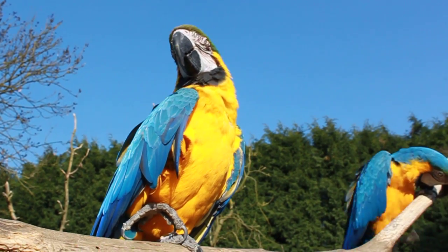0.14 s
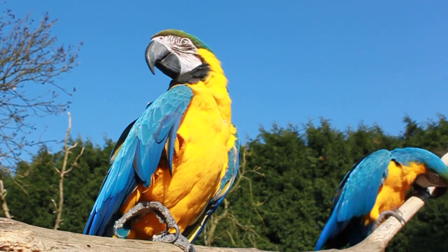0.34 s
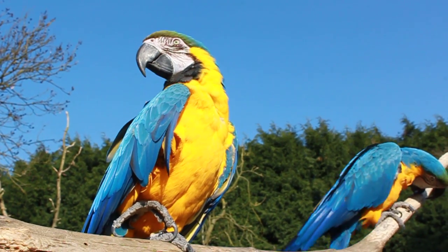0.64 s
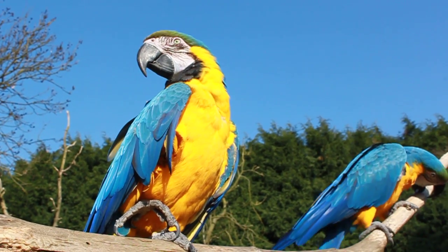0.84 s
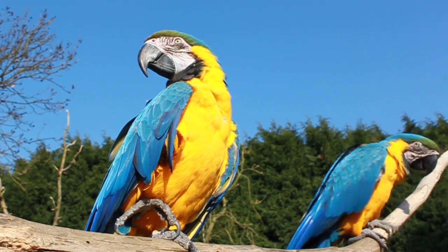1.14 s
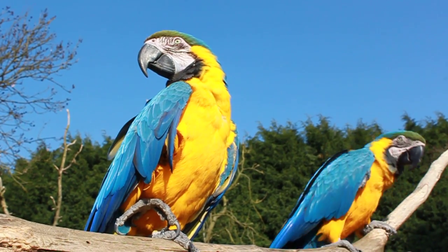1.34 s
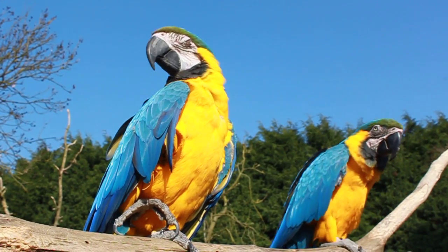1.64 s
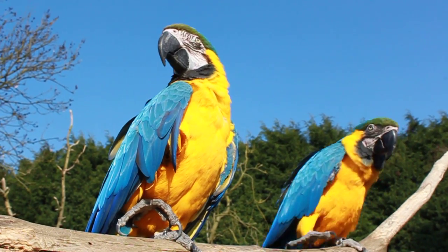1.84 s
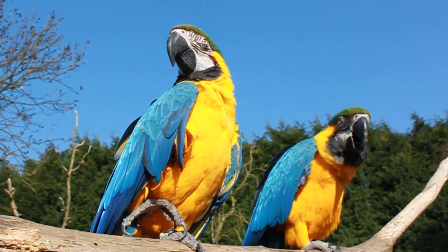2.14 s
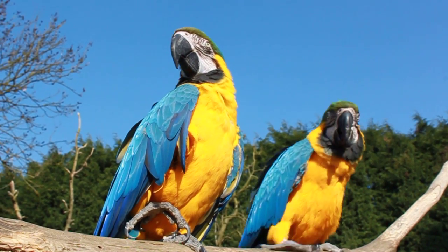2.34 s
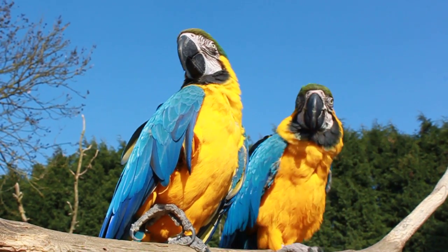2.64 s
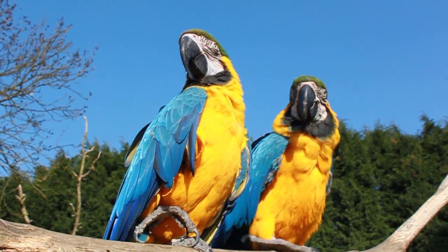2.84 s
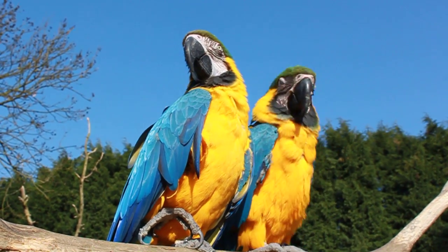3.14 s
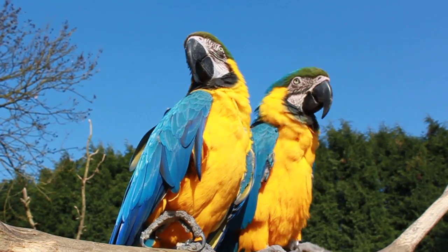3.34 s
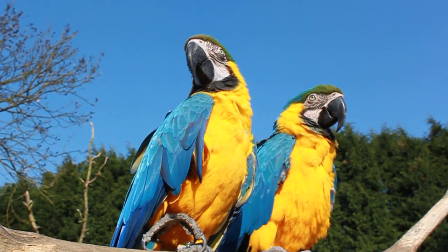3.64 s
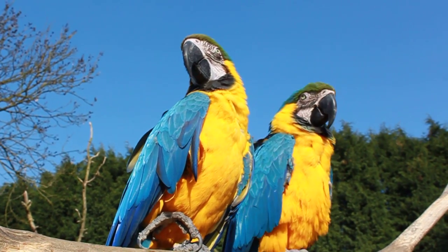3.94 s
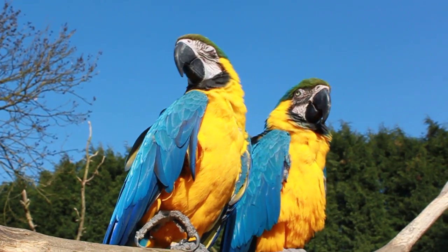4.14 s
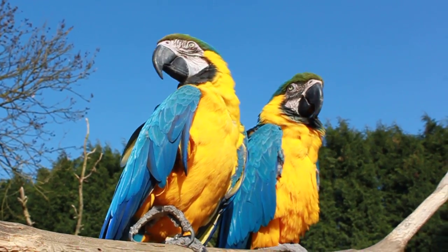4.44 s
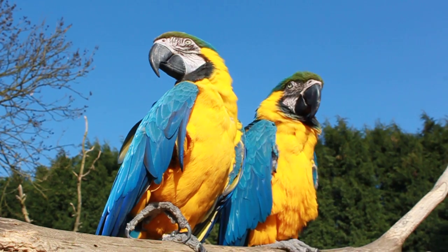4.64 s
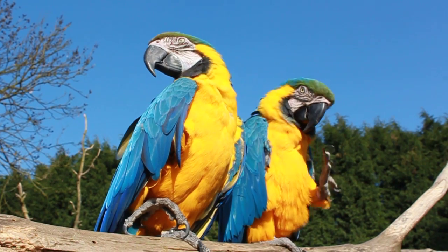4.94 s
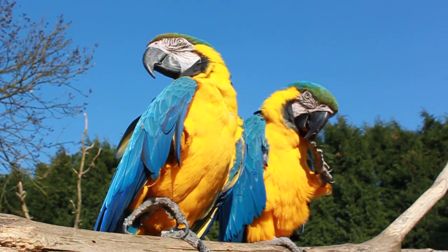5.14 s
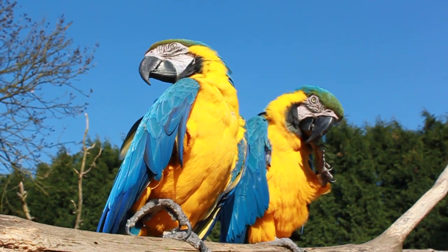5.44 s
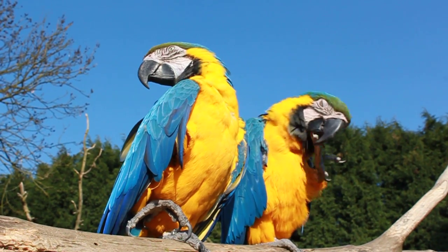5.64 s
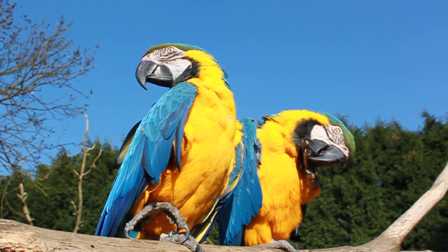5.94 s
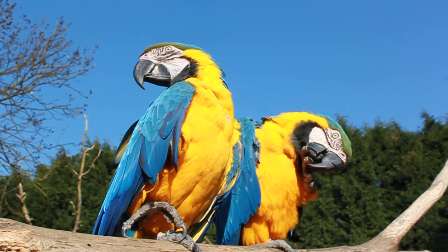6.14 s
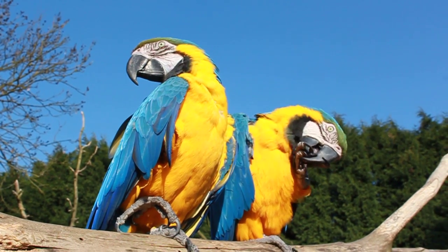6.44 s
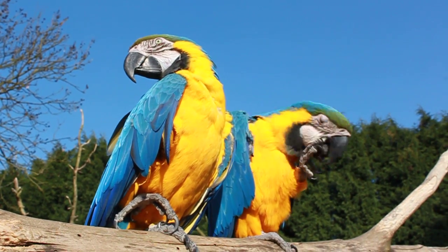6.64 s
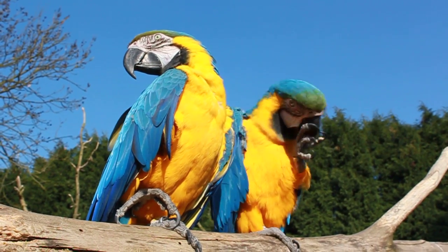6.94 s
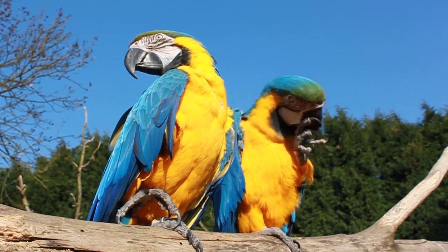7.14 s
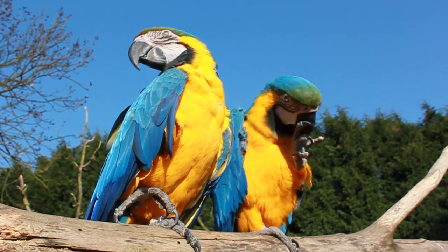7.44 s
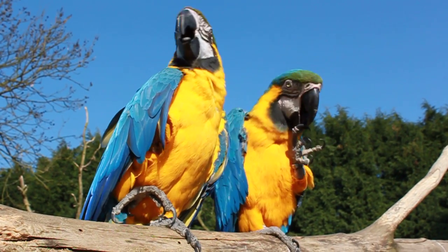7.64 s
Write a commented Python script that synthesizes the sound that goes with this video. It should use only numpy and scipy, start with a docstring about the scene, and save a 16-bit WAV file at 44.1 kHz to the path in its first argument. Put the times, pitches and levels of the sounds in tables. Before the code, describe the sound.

Large parrots call outdoors over a very faint airy hush and hum, with short diffuse echoes from hedges and walls. From 0 s, hoarse, fluttering screeches and a clear yelp burst out close, followed by rough screams near 0.65 s, more distant echoing ones from 1 s, and a strong lower scream at 1.75 s. Dry beak and claw ticks click around 0.4 and 1.2 s. Yelps at 2 s meet a short close rattling growl at 2.1 s. From 2.4 s one bird repeats a piercing whistle, sliding rapidly upward with a raspy edge, roughly every half second, with harsh screams at 3.1 to 3.9 s. Very soft perch bumps pass near 5 s, with another screech at 5.25 s. Whistles continue at 5.65, 6.25 and 6.9 s, separated by pauses and ticks. A faint yelp at 7.4 s precedes a soft grunt and loud, close, rattling growl from 7.5 to 7.8 s.

```python
"""Macaws in a garden, over a faint outdoor hush and hum: hoarse rough-voiced screeches and clear yelps
from the start, joined by noise ticks of beak and claws. At 2.1 s slapping membranes growl close by.
From 2.4 s one bird keeps sweeping up into a piercing near-sine whistle with a rasp at half its pitch.
Soft low bumps of the perch follow around 5 s; a second rattling growl ends the scene.
Hedges and walls answer the calls and clicks with a decaying noise echo."""
import sys
import numpy as np
from scipy import signal
from scipy.fft import rfft, irfft, next_fast_len
from scipy.io import wavfile
from scipy.ndimage import uniform_filter1d, minimum_filter1d, map_coordinates

SR = 44100
rng = np.random.default_rng(int(sys.argv[2]) if len(sys.argv) > 2 else 0)


def dump_mix(stems):
    """Bounce the given channels to the path in sys.argv[1] as a 16-bit WAV at rate SR."""
    frames = np.atleast_2d(stems).T  # one column per channel
    limited = np.clip(frames, -1, 1)  # hard clip at full scale
    pcm = np.round(limited * 32767).astype(np.int16)
    wavfile.write(sys.argv[1], SR, pcm)


N = 343980
TOP_HZ = 15800  # band limit


def amp(db):
    """Decibels to gain."""
    return 10 ** (np.asarray(db) / 20)


def unit(x):
    """Scale to rms 1."""
    return x / np.sqrt(np.mean(x ** 2) + 1e-20)


def along(points, hz):
    """(Hz, value) points read on a log frequency axis."""
    f, v = np.transpose(points)
    return np.interp(np.log(hz + 1), np.log(f + 1), v)


def read(rows, t):
    """Each column of a curve at the times t."""
    s, *columns = np.transpose(rows)
    return [np.interp(t, s, column) for column in columns]


def times(start_s, length_s):
    """The sample times of a call."""
    return start_s + np.arange(max(round(length_s * SR), 256)) / SR


def span(rows):
    """The sample times that a curve covers."""
    return times(rows[0][0], rows[-1][0] - rows[0][0])


def swell(t, attack_s, release_s):
    """Gain that rises, holds and falls."""
    return np.clip(np.minimum((t - t[0]) / attack_s, (t[-1] - t) / release_s), 0, 1)


def bell(t, centre, width):
    """A smooth hump of height 1."""
    return np.exp(-((t - centre) / width) ** 2)


def wobble(t, knots_per_s):
    """A smooth random curve."""
    return map_coordinates(rng.standard_normal(8192), [(t - t[0]) * knots_per_s], mode="wrap")


def filtered(x, response):
    """x times a response of frequency."""
    m = next_fast_len(len(x) + 4096)
    return irfft(rfft(x, m) * response(np.fft.rfftfreq(m, 1 / SR)), m)[:len(x)]


def coloured(x, points):
    """x with a (Hz, dB) colour, at rms 1."""
    return unit(filtered(x, lambda hz: amp(along(points, hz))))


def resonate(x, points, tilt_db):
    """Ring a (Hz, dB) body with x: a minimum-phase response, so each pulse decays after it strikes."""
    m = next_fast_len(len(x) + 4096)
    hz = np.fft.rfftfreq(m, 1 / SR)
    level_db = along(points, hz) + tilt_db * np.log2(1 + hz / 1000)
    cepstrum = irfft(np.log(amp(level_db)), m)
    cepstrum[1:m // 2] *= 2
    cepstrum[m // 2 + 1:] = 0
    response = np.exp(rfft(cepstrum))
    return unit(irfft(rfft(x, m) * response, m)[:len(x)])


def add(track, t, x):
    """Mix a call in at its time, with soft ends."""
    room = track[max(round(t[0] * SR), 0):][:len(x)]
    room += (x * swell(t, 0.0011, .0018))[:len(room)]


def cycles(hz):
    """Phase in radians of a moving pitch."""
    return 2 * np.pi * np.cumsum(hz) / SR


def buzz(phase, hz):
    """One sharp pulse a cycle: equal cosine harmonics up to the band limit at the mean pitch."""
    k = np.arange(1, int(TOP_HZ / np.mean(hz)) + 1)[:, None]
    below_nyquist = k * hz < SR / 2
    return unit(np.sum(np.cos(k * phase) * below_nyquist, axis=0))


def rough_voice(t, hz, rough, jitter):
    """Membranes slap at an unsteady, wandering rate and release a puff of turbulence each cycle."""
    rough = np.clip(rough, 0, 1)
    wander = .025 * wobble(t, 45)
    phase = cycles(hz * (1 + rough * (wander + jitter * wobble(t, 650))))
    puffs = unit(rng.standard_normal(len(t)) * (1 + 0.62 * np.cos(phase)))
    return np.sqrt(1 - rough ** 2) * buzz(phase, hz) + rough * puffs


# bass level of the outdoor air, before an offset: (time [s], level [dB])
HUSH = [(0.0, -66.5), (1.5, -53.5), (2.02, -56.5), (2.33, -73), (3.19, -61.5), (3.77, -69), (4.31, -68.5),
        (6.37, -66.5), (7.4, -64)]
# spectrum of the air: (frequency [Hz], relative level [dB])
HUSH_COLOUR = [(20, -13), (48, -1.5), (70, -11), (100, 0), (140, -3), (290, -1.5), (450, -5), (800, -5),
               (1500, -2), (4000, -3.5), (8000, -22.5), (16000, -28.5)]
# faint hum partials, before a trim: (mean frequency [Hz], level [dB])
HUM = [(193.8, -76), (290.7, -74), (667.5, -82), (721.4, -71)]


def hush(over_bass_db=9, hum_db=-1):
    """Faint outdoor air, slowly swelling noise, and slightly wavering sines as a hum."""
    t = np.arange(N) / SR
    level_db = read(HUSH, t)[0] + over_bass_db + wobble(t, 13)
    air = coloured(rng.standard_normal(N), HUSH_COLOUR) * amp(level_db)
    hum = np.zeros(N)
    for hz, db in HUM:
        phase = cycles(hz * (1 + 0.00306 * wobble(t, 5.5)))
        hum += amp(db + hum_db) * unit(np.sin(phase))
    return air + hum


# decay of the echo: (frequency [Hz], time to fall 60 dB [s])
GARDEN = [(200, 0.97), (2000, 0.69), (4000, 0.47), (8000, 0.47), (15000, 0.13)]


def garden(x, build_s=0.0035):
    """Scattered echoes from hedges and walls; the treble dies first."""
    hz, t, z = signal.stft(rng.standard_normal(SR), SR, nperseg=256)
    decay = amp(-60 * t / along(GARDEN, hz)[:, None])
    build = 1 - np.exp(-t / build_s)
    tail = signal.istft(z * decay * build, SR, nperseg=256)[1]
    return signal.fftconvolve(x, tail / np.linalg.norm(tail))[:N]


# bumps of the perch: (time [s], half length to 1/e [s], level [dB])
BUMPS = [(4.55, .08, -65), (4.86, 0.046, -61), (4.96, 0.022, -60), (5.405, .03, -62)]
# spectrum of the bumps: (frequency [Hz], relative level [dB])
BUMP_COLOUR = [(20, -14), (50, -2), (110, -1), (200, -6), (500, -32), (2000, -67)]


def perch():
    """The branch bumps softly as a bird shifts its weight: low noise under smooth humps."""
    t = np.arange(N) / SR
    noise = coloured(rng.standard_normal(N), BUMP_COLOUR)
    return noise * sum(amp(db) * bell(t, s, half_s) for s, half_s, db in BUMPS)


# ticks of beak and claws, before a trim: (time [s], level [dB])
CLICKS = [(0.3681, -33.5), (1.1755, -32), (1.2203, -33.5), (1.3076, -34.5), (4.237, -46), (4.3112, -45),
          (6.5878, -35), (6.617, -37), (6.702, -37.5), (7.1376, -28), (7.3414, -42), (7.401, -39)]
# spectrum of a tick: (frequency [Hz], relative level [dB])
CLICK_COLOUR = [(300, -33), (1500, 15), (5000, 11.5), (10000, 1.5), (16000, -3)]


def clicks(gain_db=-2):
    """Dry ticks of beak and claws: noise that dies 60 dB in 14 ms."""
    out, t = np.zeros(N), np.arange(SR // 20) / SR
    fade_db = -60 * t / .014
    for s, db in CLICKS:
        tick = coloured(rng.standard_normal(len(t)), CLICK_COLOUR) * amp(db + gain_db + fade_db)
        out[round(s * SR):][:len(t)] += tick
    return out


def mouthed(x, t, throat, shift=0.031):
    """Tongue and beak keep moving, so the throat's resonances drift up and down."""
    low = coloured(x, [(hz * (1 - shift), db) for hz, db in throat])
    high = coloured(x, [(hz * (1 + shift), db) for hz, db in throat])
    share = (1 + np.tanh(wobble(t, 18.3))) / 2
    return unit(share * high + (1 - share) * low)


def nearby(x, share):
    """Perches and fences add a cluster of quick echoes that blur the single pulses."""
    t = np.arange(SR // 50) / SR
    cluster = rng.standard_normal(len(t)) * np.exp(-t / 0.0066)
    return unit(x + share * signal.fftconvolve(x, cluster / np.linalg.norm(cluster))[:len(x)])


# throat and beak colour of each screecher: (frequency [Hz], relative level [dB])
OPENING_THROAT = [(240, -66), (400, -30.5), (707, -26), (775, -18.5), (1250, -16.5), (1780, -7), (2610, 1),
                  (2820, -6), (3390, -3.5), (4080, -7), (5300, -11.5), (7210, -27.5), (10400, -35.5),
                  (14000, -46), (15800, -59)]
FADING_THROAT = [(180, -63), (300, -34), (654, -22.5), (812, -13.5), (1210, -16.5), (1500, -6.5),
                 (1710, -10), (2270, -1.5), (2820, -8), (3730, -5), (4410, -17), (4870, -9.5), (6350, -22),
                 (8700, -24.5), (15800, -49.5)]
DISTANT_THROAT = [(240, -55), (400, -47), (768, -14.5), (1020, -8.5), (1120, -10.5), (1570, -4), (1940, 7),
                  (2470, -4.5), (2700, 5), (3150, -8), (3660, -0.5), (4390, -11.5), (5350, -12),
                  (7810, -29), (15000, -40.5)]
ANSWER_THROAT = [(240, -57), (400, -23), (584, -27.5), (828, -13), (1010, -18), (1770, -5.5), (2290, -5.5),
                 (2510, -6), (2830, -7.5), (4600, -12), (6420, -30), (7240, -26.5), (15000, -79)]
HARSH_THROAT = [(180, -46), (300, -63), (812, -16.5), (1040, -18), (1270, -4.5), (1430, -7), (1660, -11.5),
                (1920, 0.5), (2310, -13.5), (2550, -3.5), (3440, -14), (4330, -11.5), (6450, -29),
                (7370, -31), (15800, -56)]
LONG_THROAT = [(180, -58), (300, -55), (676, -31.5), (1040, -13), (1230, -17), (1520, -11), (1710, -13.5),
               (2270, -0.5), (2770, -9), (3730, -8.5), (4330, -13.5), (4950, -11), (6450, -21.5),
               (10800, -30), (15800, -48)]
LATE_THROAT = [(240, -93), (400, -57), (474, -47), (812, -30.5), (991, -18.5), (1480, -11), (1750, -23),
               (1950, -1), (2140, -12.5), (2380, -7.5), (3190, -18.5), (5140, -21), (7670, -36),
               (13500, -49), (15800, -52)]
# screeches: (start [s], length [s], attack [s], release [s], level before the fade [dB],
#             fade over the call [dB], first pitch [Hz], last pitch [Hz], mid-call roughness [0-1],
#             echo send [dB], throat)
SCREECHES = [ (0, 0.12, 0.003, 0.0066, -18.5, 6.5, 749, 793, 0.51, -16, OPENING_THROAT),
             (.148, 0.086, 0.0061, 0.026, -23, -1, 890.5, 902, 0.68, -12, OPENING_THROAT),
             (.643, 0.39, 0.056, 0.017, -18, 12.5, 750.7, 763.2, 0.85, -11, FADING_THROAT),
             (1.029, .32, .01, 0.011, -41.5, 3.5, 979, 988, 0.76, -1, DISTANT_THROAT),
             (1.308, 0.41, 0.16, 0.11, -29, 6.5, 828.3, 880, 0.85, -2.5, ANSWER_THROAT),
             (1.659, 0.13, .01, .01, -38, 1.5, 860, 854, .95, -1, DISTANT_THROAT),
             (1.756, 0.4, 0.031, 0.0071, -18.5, 3, 466.5, 536, .5, -9.5, HARSH_THROAT),
             (2.3, .5, 0.15, .025, -32.5, -0.5, 483.7, 474.8, 0.75, -3.5, DISTANT_THROAT),
             (3.145, .35, 0.033, 0.022, -18.5, 7, 505.2, 553, .74, -10, LONG_THROAT),
             (3.475, .41, .015, 0.092, -24.5, -2, 532, 510.2, .54, -10.5, LONG_THROAT),
             (5.24, .49, 0.045, 0.1, -29.5, -6.5, 467.4, 570, 0.56, -12.5, LATE_THROAT),
             (5.96, 0.2, 0.082, 0.093, -42, 2, 760, 825, 0.9, -6, ANSWER_THROAT), ]
FLUTTER_HZ, FLUTTER_DB = 85.26, 3  # surges: mean rate, depth either way
SCREECH_JITTER = .12  # pitch scatter at full roughness [share]
CLEARING = .18  # roughness lost from start to end


def screeches():
    """Hoarse gliding screams with irregular pressure surges: direct sound and echo send."""
    direct, scattered = np.zeros(N), np.zeros(N)
    for (start_s, length_s, attack_s, release_s, db, fade_db,
         first_hz, last_hz, rough, echo_db, throat) in SCREECHES:
        t = times(start_s, length_s)
        u = (t - start_s) / length_s
        surge_phase = cycles(FLUTTER_HZ * (1 + 0.3994 * wobble(t, 110)))
        flutter = np.tanh(0.76 * np.sin(surge_phase) + 0.687 * wobble(t, 200))
        # each surge of pressure also bends the pitch
        bend = 1 + 0.0157 * flutter + 0.012 * wobble(t, 35.16)
        hz = (first_hz + (last_hz - first_hz) * u) * bend
        roughness = rough - CLEARING * (u - .5) + 0.0693 * wobble(t, 14)
        voice = rough_voice(t, hz, roughness, SCREECH_JITTER)
        voice = mouthed(nearby(voice, share=0.89) * amp(FLUTTER_DB * flutter), t, throat)
        level_db = db - fade_db * u + 0.62 * wobble(t, 44.6)
        call = voice * swell(t, attack_s, release_s) * amp(level_db)
        add(direct, t, call)
        add(scattered, t, call * amp(echo_db))
    return direct, scattered


# yelps: (start [s], length [s], rise [s], first pitch [Hz], top pitch [Hz], last pitch [Hz],
#         mid-call level [dB], swell over the call [dB], typical roughness [0-1])
YELPS = [ (0.088, 0.071, .012, 1300, 1422, 1292, -26.5, 4.5, 0.17),
         (0.434, 0.06, 0.042, 1937, 1970, 1840, -54.5, 1, 0.24),
         (0.581, 0.019, 0.0036, 1520, 1570, 1246, -50.5, -16, 0.15),
         (2.0, .13, 0.096, 2095, 2180, 2060, -31, 6, 0.08),
         (2.114, .11, .006, 1393, 1418, 1275, -28, -8, .23),
         (2.754, 0.094, 0.077, 1147, 1540, 1540, -31, 4.5, 0.36),
         (2.838, 0.16, 0.0042, 1564, 1543, 1201, -26.5, -0.5, .25),
         (3.062, .07, 0.042, 1414, 1414, 1370, -35, 2, 0.6),
         (4.943, 0.069, .04, 1445, 1454, 1415, -55, 15, 0.26),
         (5.003, 0.077, 0.013, 1417, 1497, 1410, -39.5, -7, 0.49),
         (7.414, .092, .065, 1617, 1730, 1595, -42, 15, 0.5), ]
# throat of the yelpers: (frequency [Hz], relative level [dB])
YELP_THROAT = [(500, -40), (1400, -1), (2600, 8.5), (4300, 1.5), (5400, -0.5), (7000, -10.5), (9500, -19),
               (11000, -29), (16000, -38)]
YELP_EDGE_S = 0.0071  # attack and release
YELP_FALL_SHAPE = .5  # under 1: the pitch drops fast at first


def yelps():
    """Short high calls: the syrinx vibrates almost regularly, with rough catches now and then."""
    out = np.zeros(N)
    for start_s, length_s, rise_s, first_hz, top_hz, last_hz, db, swell_db, roughness in YELPS:
        t = times(start_s, length_s)
        rising = np.clip((t - start_s) / rise_s, 0, 1)
        falling = np.clip((t - start_s - rise_s) / (length_s - rise_s), 0, 1)
        hz = first_hz + (top_hz - first_hz) * rising + (last_hz - top_hz) * falling ** YELP_FALL_SHAPE
        catches = roughness * amp(4.9 * np.tanh(wobble(t, 68.9)))
        voice = coloured(rough_voice(t, hz, catches, jitter=0.09), YELP_THROAT)
        level_db = db + swell_db * ((t - start_s) / length_s - .5) + 5.4 * np.tanh(wobble(t, 143.3))
        add(out, t, voice * swell(t, YELP_EDGE_S, YELP_EDGE_S) * amp(level_db))
    return out


# throat with the beak open, then half shut: (frequency [Hz], relative level [dB])
GROWL_THROAT = [(40, -44), (200, -30), (500, -23), (850, -10.5), (1380, 8), (1900, -7), (2600, -8.5),
                (3200, 0), (3700, -12), (4450, -1), (5150, -13), (5950, -6.5), (6700, -25.5), (7700, -19.5),
                (8700, -31), (9700, -18.5), (10700, -22), (12000, -40), (13200, -23), (15500, -36)]
NARROW_THROAT = [(40, -61), (300, -13.5), (550, -8.5), (900, 5), (1450, 4.5), (2300, -24.5), (3150, -2.5),
                 (3750, -17), (4450, -6), (5900, -9.5), (6700, -27), (7700, -21), (9000, -47),
                 (11200, -18.5), (12600, -36), (15500, -36)]


def growl(call, throb_hz, scatter, tilt_db):
    """Separate slaps of the membranes, bunched into throbs, ring the throat as the beak moves."""
    t = span(call)
    db, rate_hz, throb_db, opening = read(call, t)
    throb = np.sin(cycles(throb_hz * (1 + .1 * wobble(t, 40))))
    turns = np.cumsum(rate_hz * (1 - 0.11 * throb + scatter * wobble(t, 400))) / SR
    strikes = np.diff(np.floor(turns), prepend=0)
    slaps = strikes * amp(1.0 * rng.standard_normal(len(t))) / np.sqrt(rate_hz)
    air = rng.standard_normal(len(t)) * np.exp(-4 * (turns % 1))  # a burst after each slap
    source = (unit(slaps) + 1.13 * unit(air)) * amp(throb_db * throb)
    gape = np.clip(opening + 0.2 * throb, 0, 1)
    wide = gape * resonate(source, GROWL_THROAT, tilt_db)
    narrow = (1 - gape) * resonate(source, NARROW_THROAT, tilt_db)
    out = np.zeros(N)
    add(out, t, unit(wide + narrow) * amp(db))
    return out


# growl gestures: (time [s], level [dB], mean pulse rate [Hz], throb depth [dB], beak opening [0-1])
FIRST_GROWL = [(2.11, -24.5, 480, 7.5, 0.15), (2.2, -25, 370, 7.5, 0.82), (2.238, -19.5, 368, 3.5, 0.96),
               (2.296, -24.5, 330, -3, 1), (2.32, -39, 260, -1, 1)]
GRUNT = [(7.502, -32, 327, -3, .2), (7.527, -35.5, 305, 0, .1)]  # soft lead-in of the last growl
LAST_GROWL = [(7.526, -26, 303.4, 0, .1), (7.543, -20, 290.9, -2, .05), (7.568, -16.5, 270.1, -3.5, .15),
              (7.576, -17, 802.4, 7, .35), (7.605, -13.5, 853.6, 0, 0.85), (7.68, -16, 763, 8.5, 0.93),
              (7.71, -19, 438, 1.5, 0.79), (7.797, -31.5, 324.4, -4.5, 0.9)]


def growls():
    """Two close rattles of slapping membranes, the last after a soft grunt."""
    return (growl(FIRST_GROWL, throb_hz=59.55, scatter=0.18, tilt_db=-0.5)
            + growl(GRUNT, throb_hz=53.6, scatter=0.063, tilt_db=-2)
            + growl(LAST_GROWL, throb_hz=57.95, scatter=.1, tilt_db=4))


CLIMB, CLIMB_S = 0.0401, 0.0222  # starts this share under the top pitch; settling time
SAG, SAG_S = 0.089, .021  # sinks by this share as the pressure runs out; time constant


def whistle_pitch(t, start_s, end_s, top_hz):
    """The pitch follows the pressure in a flat arch: it climbs, holds and sags."""
    climb = CLIMB * np.exp((start_s - t) / CLIMB_S)
    sag = SAG * np.exp(np.minimum(t - end_s, 0) / SAG_S)
    return top_hz * (1 - climb - sag)


# slide into a whistle: (time from the whistle's start [s], pitch [Hz], relative level [dB])
UPSWEEP = [(-.055, 899, -26.5), (-.042, 1106, -1.5), (-.032, 1448, 0.5), (-.023, 2018, 4.5),
           (-.014, 2250, 5.5), (.004, 2363, -0.5)]
# throat in the slide: (frequency [Hz], relative level [dB])
SWEEP_THROAT = [(700, -21.5), (1300, -6.5), (2200, -3.5), (2700, 0), (3900, 7.5), (4500, -0.5), (5000, 0.5),
                (5600, -7), (6500, -15), (7400, -13.5), (8200, -29), (11500, -33), (12600, -38),
                (15500, -31)]


def upsweep(start_s, sweep_db):
    """Before each whistle the rough voice slides up, cracking on the way."""
    t = span(UPSWEEP)
    hz, db = read(UPSWEEP, t)
    crack = 0.22 + .5 * bell(t, -0.0344, 0.0058)
    voice = coloured(rough_voice(t, hz, crack, jitter=0.14), SWEEP_THROAT)
    return t + start_s, voice * amp(db + sweep_db + 2.1 * wobble(t, 172))


# harmonics of the tone, in order: (multiple, relative level [dB])
OVERTONES = [(1, 13), (2, -25.5), (3, -29), (4, -48)]
ONSET_DB, ONSET_S = 5.5, 0.023  # the tone starts this much weaker
DIP_WIDTH = 0.064  # dip in the loudness as direct sound and reflections partly cancel [share of length]
PUSH_BEFORE_END_S, PUSH_WIDTH_S = 0.021, 0.011  # last push
RELEASE_DB, RELEASE_S = 16.5, .008  # the tone dies


def tone(start_s, length_s, top_hz, db, dip_at, dip_db, push_db):
    """A nearly pure whistle, unsteady at both ends; its level dips once; it ends with a push or a droop."""
    t, end_s = times(start_s, length_s), start_s + length_s
    unstable = np.exp((start_s - t) / 0.033) + np.exp((t - end_s) / 0.022)
    drift = 0.0021 * wobble(t, 49.7) + (0.00049 + 0.021 * unstable) * wobble(t, 405.6)
    phase = cycles(whistle_pitch(t, start_s, end_s, top_hz) * (1 + drift))
    voice = unit(sum(amp(level) * np.sin(k * phase) for k, (_, level) in enumerate(OVERTONES, 1)))
    push = push_db * bell(t, end_s - PUSH_BEFORE_END_S, PUSH_WIDTH_S)
    dip = dip_db * bell((t - start_s) / length_s, dip_at, DIP_WIDTH)
    onset = ONSET_DB * np.exp((start_s - t) / ONSET_S)
    release = RELEASE_DB * np.exp((t - end_s) / RELEASE_S)
    flicker = 0.84 * wobble(t, 41) + (1.9 + 4.3 * unstable) * np.tanh(wobble(t, 127))
    return t, voice * amp(db + push - dip - onset - release + flicker)


# throat of the rasp: (frequency [Hz], relative level [dB])
RASP_THROAT = [(1100, -31), (1800, -7.5), (2250, -8), (2650, -5), (3700, 7.5), (4600, -1), (5500, 5.5),
               (6400, -7), (7400, -3), (8800, -22), (10800, -17), (12600, -19.5), (13700, -23),
               (15500, -24.5)]


def rasp(start_s, length_s, top_hz, under_db, ends_db, overhang_s=0.01524):
    """A rasp at half the whistle's pitch: it bursts out at both ends and outlasts the tone, falling."""
    t, end_s = times(start_s, length_s + overhang_s), start_s + length_s
    bursts = np.exp((start_s - t) / 0.03) + bell(t, end_s - .014, 0.019)
    release = np.exp((t - t[-1]) / 0.01288)
    hz = whistle_pitch(t, start_s, end_s, top_hz) / 2 * (1 - 0.167 * release)
    voice = coloured(rough_voice(t, hz, .9 - 0.32 * bursts, jitter=0.0572), RASP_THROAT)
    undertone = amp(under_db + 6.4 * np.tanh(wobble(t, 58.7))) * (1 - release)
    flicker = amp(2.1 * np.tanh(wobble(t, 303.6)))
    return t, voice * (undertone + amp(ends_db - 5.5) * bursts) * flicker


# whistles: (start [s], length [s], top pitch [Hz], level [dB], place of the dip [0-1],
#            dip depth [dB], last push [dB], upsweep gain [dB], rasp under the tone [dB],
#            rasp at its ends before a trim [dB])
WHISTLES = [ (2.403, .17, 3810, -29.5, .25, 1, 1, -41.5, -54, -34.5),
            (2.969, .19, 3833, -19, 0.3, 13, 3.5, -27, -38, -26.5),
            (3.412, 0.18, 3906, -19, 0.45, 10, -4.5, -32.5, -54, -45),
            (3.856, 0.2, 3890, -20, 0.51, 22, 6.5, -30, -38.5, -25.5),
            (4.456, 0.2, 3936, -18, 0.64, 7.5, 4.5, -24, -32.5, -30.5),
            (5.12, 0.19, 3935, -18.5, .22, 4.5, 2.5, -26.5, -32, -33),
            (5.644, .195, 3972, -17.5, .42, 3.5, -5, -27, -36, -28),
            (6.262, 0.2, 4038, -15.5, .46, 5, -7, -30, -41, -24.5),
            (6.909, 0.21, 3953, -19, 0.34, 2, 6, -30.5, -36, -25.5), ]


def whistles():
    """One bird repeats its call: an upsweep breaks into a tone with a rasp beneath it."""
    out = np.zeros(N)
    for (start_s, length_s, top_hz, db, dip_at, dip_db, push_db,
         sweep_db, under_db, ends_db) in WHISTLES:
        add(out, *upsweep(start_s, sweep_db))
        add(out, *tone(start_s, length_s, top_hz, db, dip_at, dip_db, push_db))
        add(out, *rasp(start_s, length_s, top_hz, under_db, ends_db))
    return out


def scene():
    """Mix of all layers: the farther a bird, the more of its call arrives as echo."""
    flock, scattered = screeches()
    yelpers, whistler = yelps(), whistles()
    near = growls() + clicks()
    echo = garden(scattered + amp(-9.0) * yelpers + amp(-11.5) * whistler + amp(-22.0) * near)
    return (flock + yelpers + whistler + near + echo + perch() + hush())[None]


def record(dry, ceiling=0.45, hold_s=0.0024):
    """A limiter holds down the highest peaks; nothing passes above the band limit."""
    width = max(int(hold_s * SR), 32)
    needed = ceiling / np.maximum(np.abs(dry[0]), ceiling)
    gain = uniform_filter1d(minimum_filter1d(needed, width), width)
    return filtered(dry[0] * gain, lambda hz: hz < TOP_HZ)[None]


dry = scene()
out = record(dry)
dump_mix(out)
```